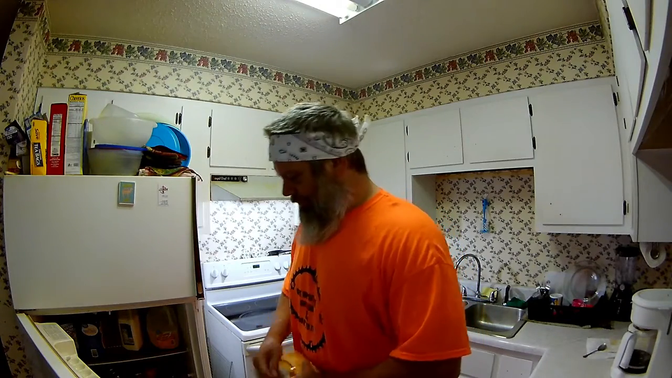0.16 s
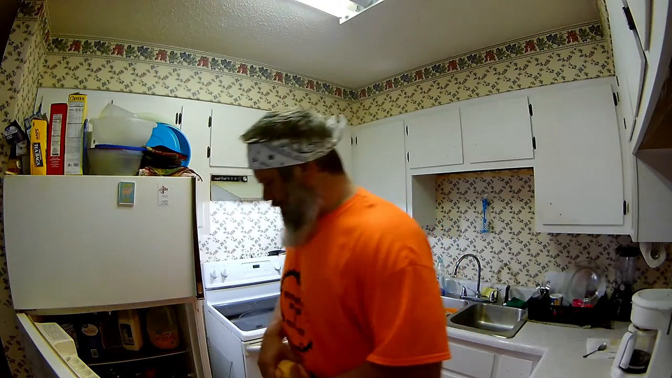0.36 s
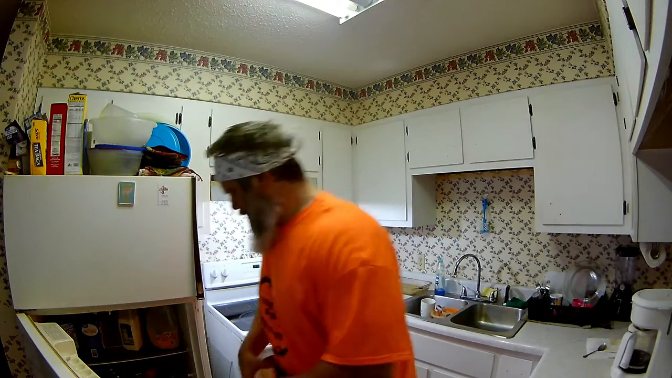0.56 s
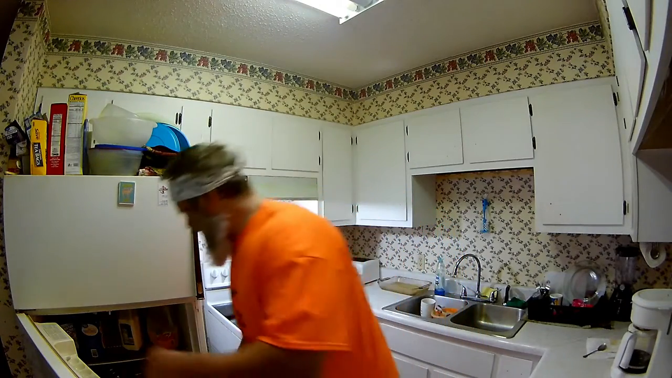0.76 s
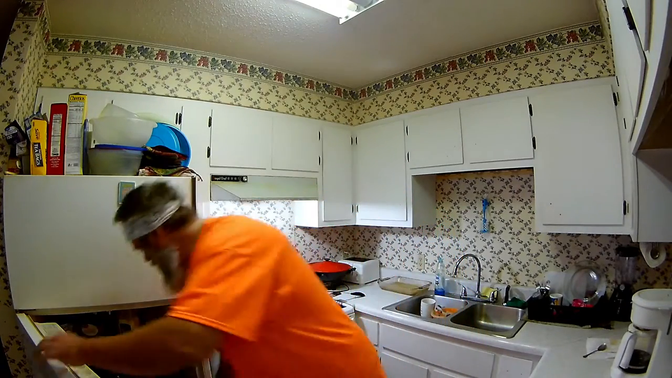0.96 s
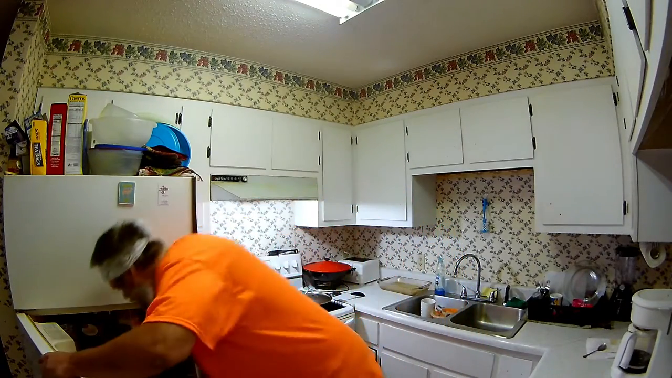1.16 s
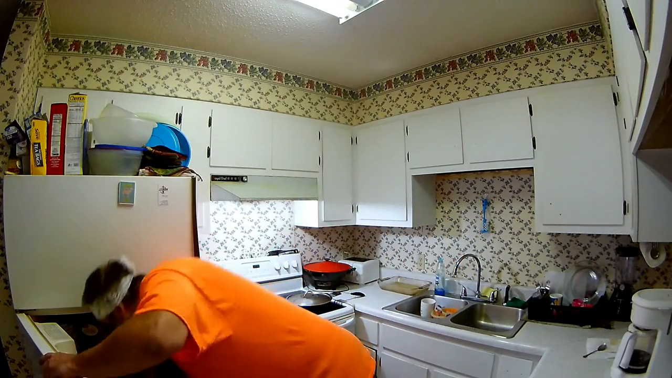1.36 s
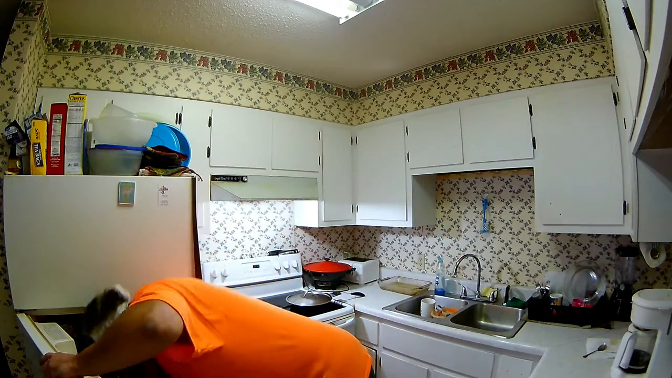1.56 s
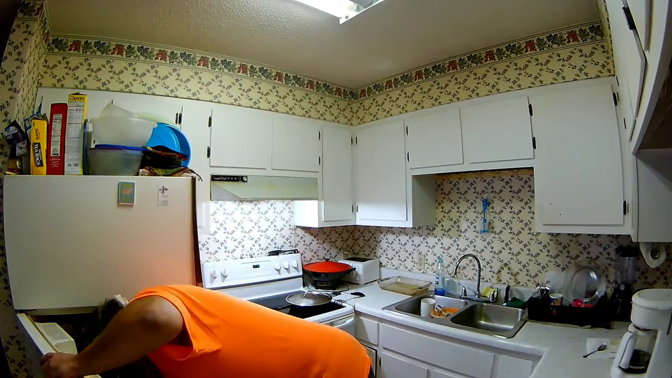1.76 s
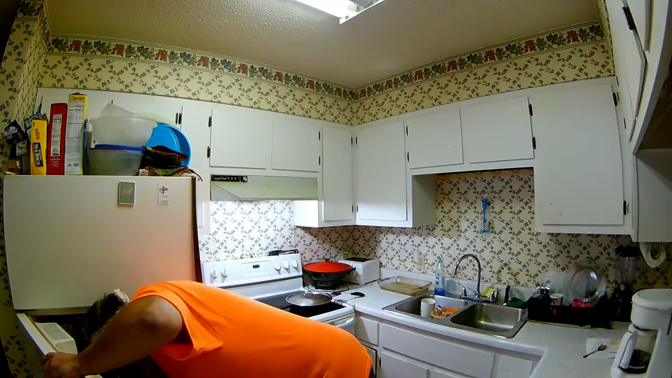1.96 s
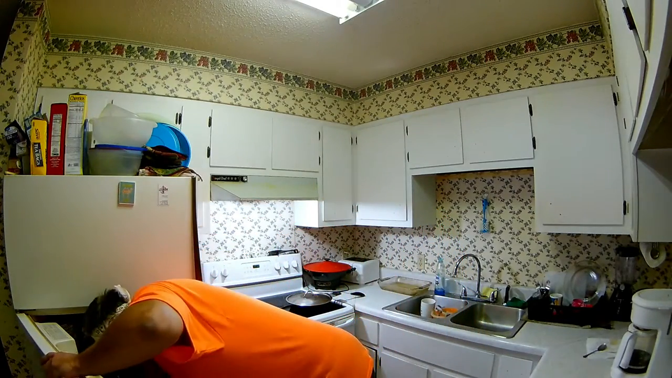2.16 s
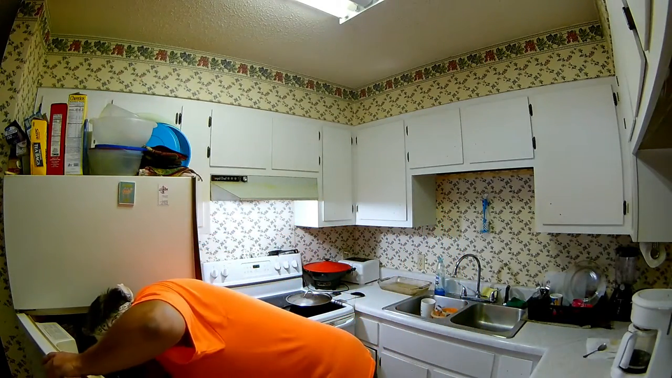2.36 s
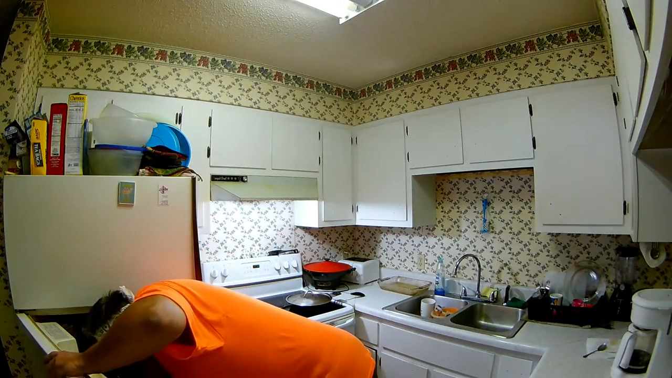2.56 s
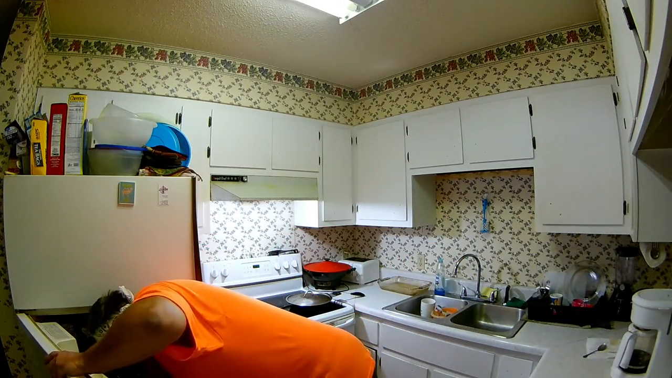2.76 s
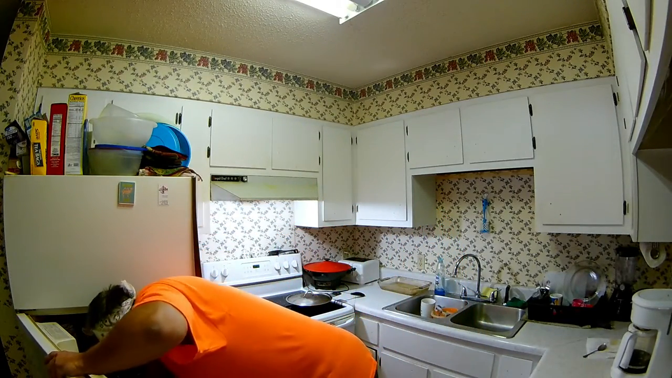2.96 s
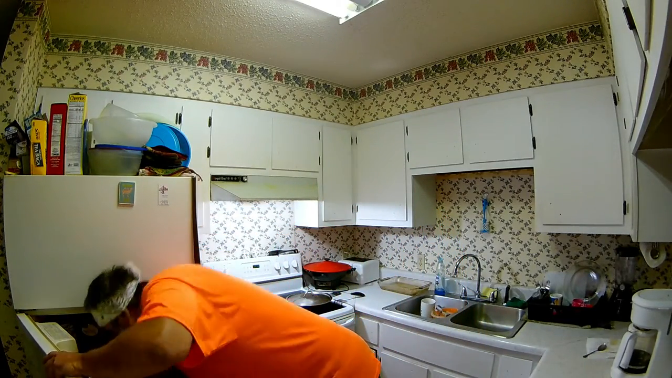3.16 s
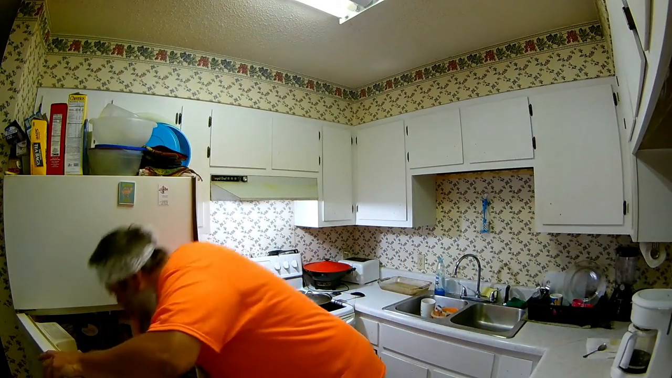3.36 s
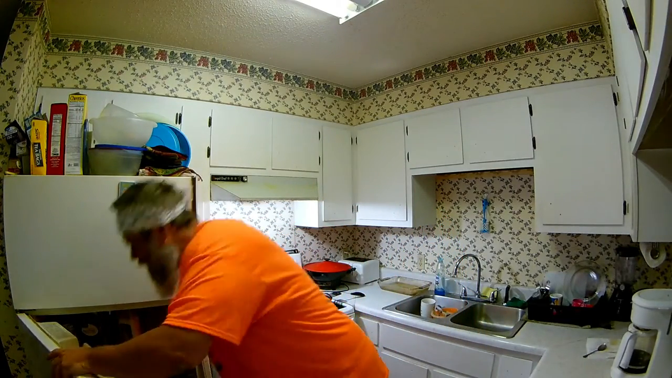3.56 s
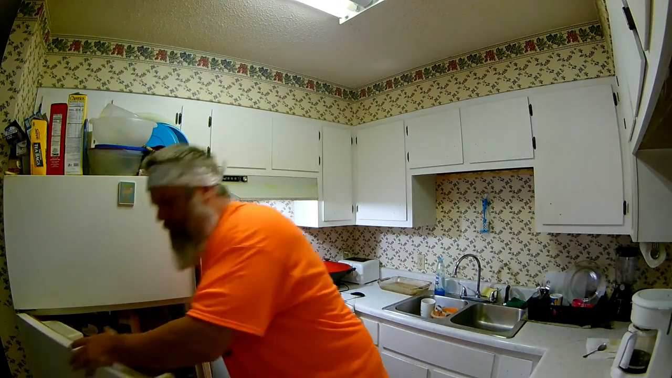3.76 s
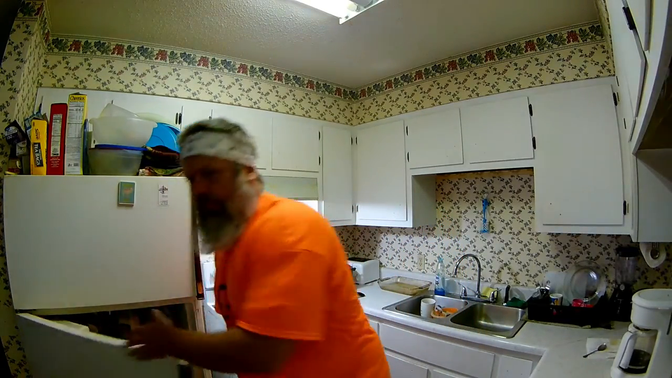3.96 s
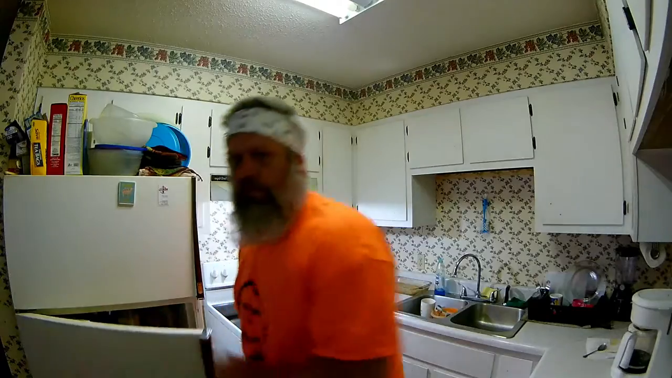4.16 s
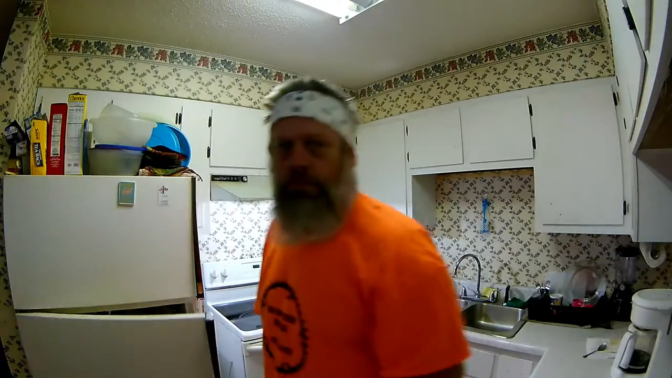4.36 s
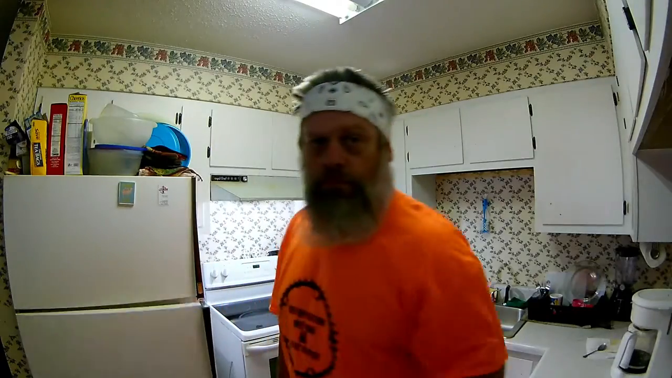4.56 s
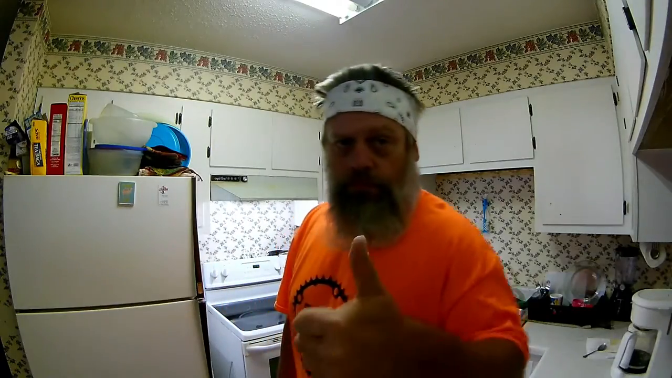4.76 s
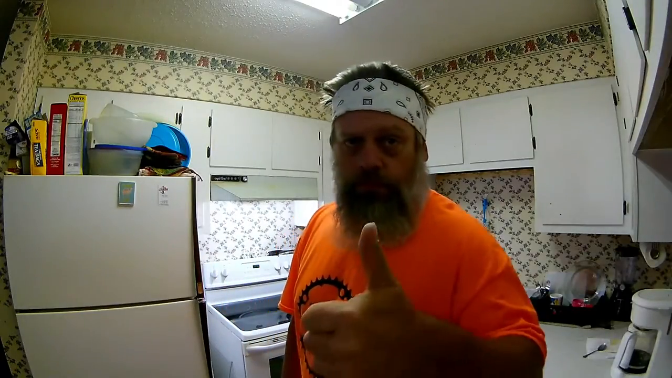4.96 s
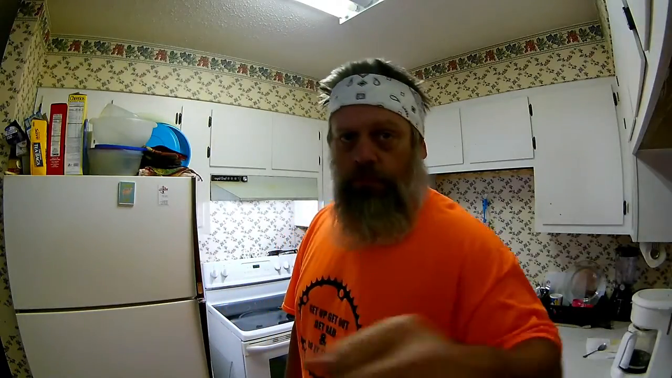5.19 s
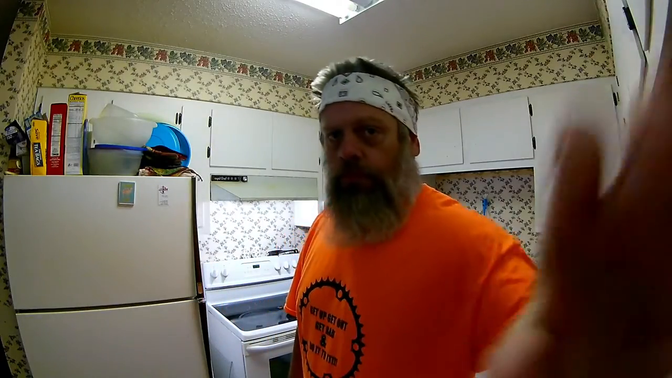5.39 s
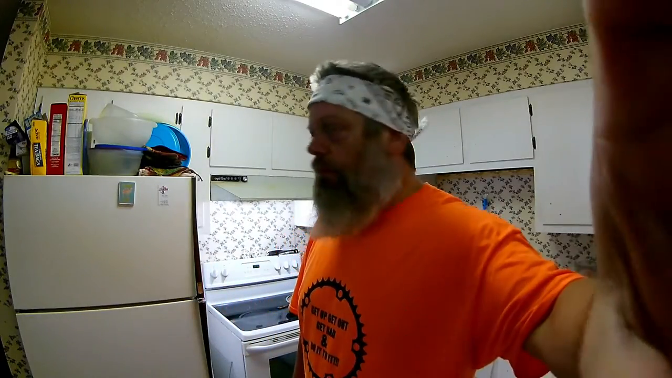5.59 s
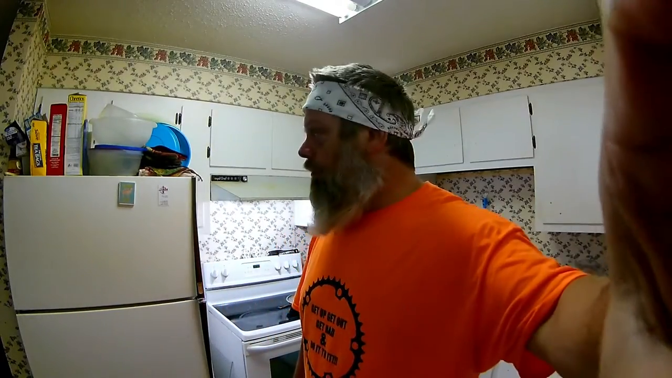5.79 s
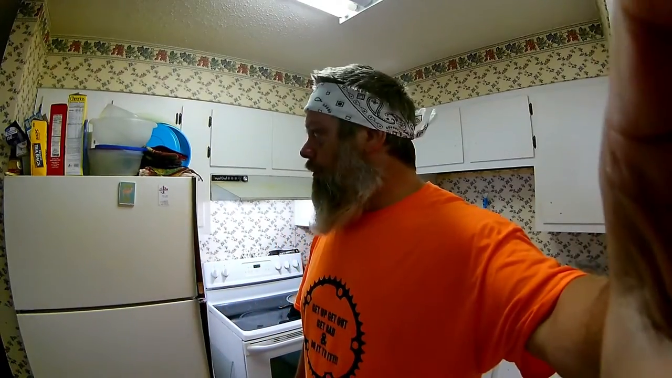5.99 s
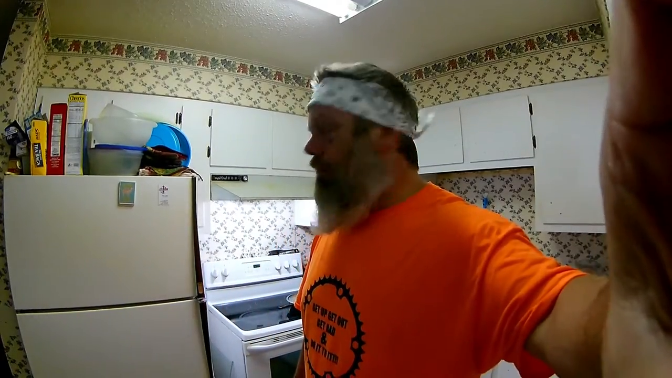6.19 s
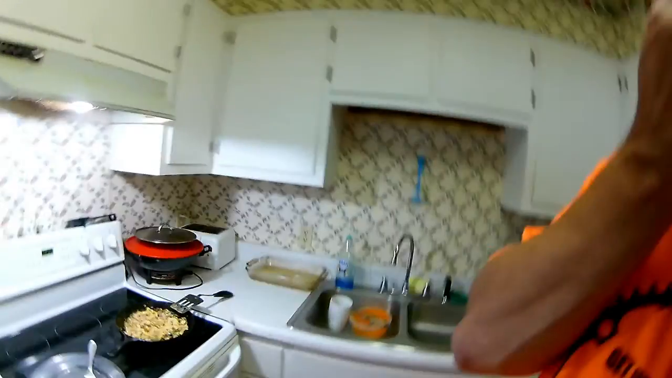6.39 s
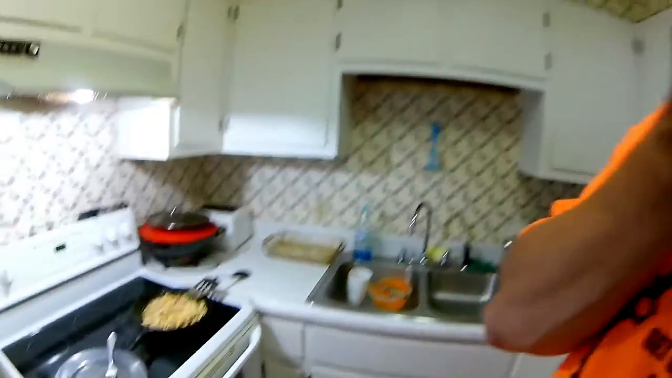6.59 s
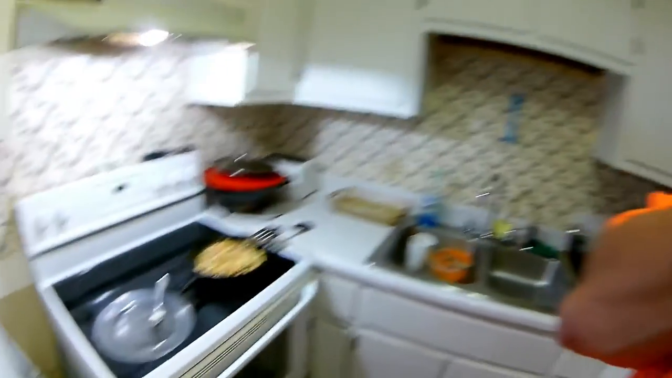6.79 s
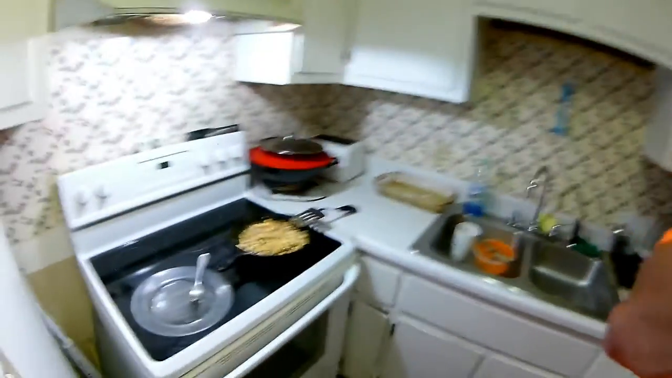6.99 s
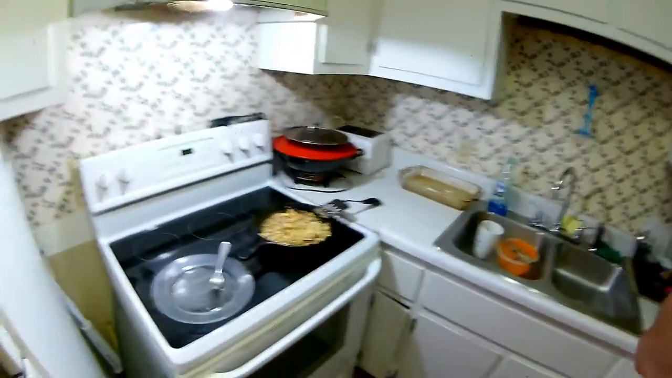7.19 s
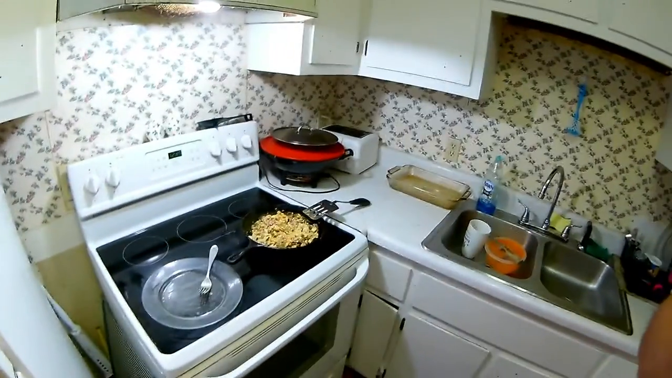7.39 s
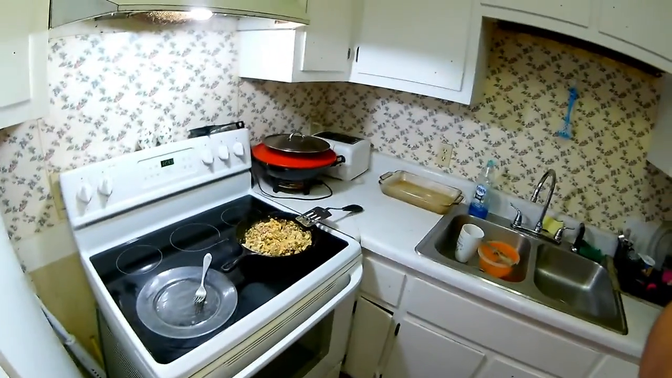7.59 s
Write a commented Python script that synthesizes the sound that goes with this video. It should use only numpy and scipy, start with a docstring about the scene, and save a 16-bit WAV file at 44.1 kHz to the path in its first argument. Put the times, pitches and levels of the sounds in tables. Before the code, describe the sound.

In a small kitchen, hands rummage in a humming fridge, bang a plastic drawer home, shut the door with a deep thump, then rub the microphone.

```python
"""In a small kitchen, a man rustles a crinkly package and rummages in an open refrigerator.
Rubbing is modelled as clumped slips filtered by surface tones; knocks and the door as damped modes and noise.
A drawer knocks home hollowly, the door shuts with a click and a deep thump, and fingers rub on a camera.
The compressor's steady sines, narrow-band singing and coloured air noise run beneath.
The sound drops out twice, the second time returning with a click."""
import sys
import numpy as np
from scipy import signal
from scipy.io import wavfile

SR = 44100
rng = np.random.default_rng(int(sys.argv[2]) if len(sys.argv) > 2 else 0)


def store_wav(level_fs):
    """Save 16-bit WAV to argv[1]."""
    pcm = np.round(np.clip(np.atleast_2d(level_fs), -1, 1) * 32767)
    wavfile.write(sys.argv[1], SR, pcm.T.astype(np.int16))


N = 336703
TIME = np.arange(N) / SR  # s

# Package squeezed, turned and put down: peak_s, rise_s, fall_s, body_db, crackle_db
PACKAGE_STROKES = [(.14, 0.4, 0.13, -39.5, -62.5), (.32, 0.12, 0.051, -44.5, -70),
                   (.48, 0.18, 0.11, -43.5, -65.5), (.72, 0.32, 0.22, -54.5, -78)]
# Spectrum of the package body: frequency_hz, level_db
PACKAGE_SPECTRUM = [(60, -19), (130, -32), (260, -1), (350, -16), (430, 1), (700, 1), (1050, -2),
                    (1450, -10), (2250, -10.5), (3200, -43.5), (5000, -61)]
# Film buckling: start_s, peak_db (before the kitchen's reverberation)
FILM_BUCKLES = [(0.0218, -44), (0.091, -41.5), (0.1288, -38), (0.2133, -41), (0.304, -45), (0.342, -49)]
# Spectrum of a film snap: frequency_hz, level_db
FILM_SPECTRUM = [(1000, -16), (2400, 11), (3200, 11), (5000, 5), (7000, 3), (7900, -18), (9000, -9),
                 (12500, -7), (15000, -23)]
BUCKLE_DECAY_S = 0.004  # time constant

# Plastic on plastic, as a hand reaches in, a container is pushed along a shelf, the drawer jerks loose,
# runs in and rides over its stop, and the door swings: peak_s, rise_s, fall_s, body_db, scrape_db
SLIDING_STROKES = [(1.04, 0.2, 0.075, -51.5, -73), (1.22, 0.22, 0.13, -54.5, -80),
                   (1.78, 0.37, 0.57, -46, -79), (1.733, 0.1, .11, -35, -60.5),
                   (2.592, 0.035, .05, -33, -61), (2.722, .016, 0.032, -39.5, -55),
                   (2.82, 0.27, 0.18, -35, -64.5), (2.964, 0.012, 0.037, -29.5, -62),
                   (4.015, 0.049, 0.056, -49, -68.5), (4.65, 0.28, 0.099, -43, -69.5)]
# Spectrum of the sliding body: frequency_hz, level_db
SLIDING_SPECTRUM = [(40, -3), (120, -2.5), (240, -0.5), (310, 5), (370, -8.5), (445, 7), (520, -3),
                    (600, -1), (700, -1), (900, -4.5), (1200, -10.5), (1500, -14.5), (2300, -16.5),
                    (3200, -50.5), (6000, -71)]
# Bright spectrum shared by package crackle and sliding scrape: frequency_hz, level_db
SCRAPE_SPECTRUM = [(1500, -27), (2600, 8), (3200, -0.5), (4500, 8), (7000, -2), (7900, -17), (9000, -11.5),
                   (12500, -12.5), (16000, -26.5)]

# Drawer knocking in its runners: start_s, level_db, contact_brightness_hz
DRAWER_KNOCKS = [(2.556, -33, 300), (2.577, -28, 410), (2.603, -28.5, 800), (2.712, -31.5, 1500),
                 (2.8705, -12.5, 1696), (2.895, -24, 2200), (2.914, -23.5, 1600), (2.940, -23, 700),
                 (2.960, -24.5, 300), (2.992, -30.5, 800)]
# Modes of plastic drawer and liner: frequency_hz, level_db, t60_s
LINER_MODES = [(90.5, -8.5, 0.25), (151.6, -2.5, 0.22), (210, -4, 0.25), (243, 4, 0.2), (268, 5.5, 0.1),
               (339.4, -8, 0.31), (450.3, 8.5, 0.2), (592.4, -2, 0.36), (728, 0.5, 0.12), (818, -7, 0.43),
               (896, -19.5, 0.19), (1013, -9, 0.37), (1016, -23, 0.4), (1156, -20.5, 0.64),
               (1448, -25.5, 0.38), (1800, -25, 0.39)]
# Dense response of drawer and room: frequency_hz, level_db
LINER_SPECTRUM = [(40, -31.5), (110, -7.5), (250, -0.5), (380, 5), (600, 2.5), (1000, -5), (1400, -15),
                  (2200, -17), (3000, -37.5), (6500, -35.5), (9000, -43), (16000, -49)]

# Door meeting its gasket: start_s, level_db, contact_brightness_hz
DOOR_BLOWS = [(4.7295, -27.5, 6000), (4.737, -27, 4060)]
# Modes of door and cabinet: frequency_hz, level_db, t60_s
DOOR_MODES = [(167, -19, 0.9), (241, 13, 0.29), (509, 5, 0.22), (527, 6, 0.21), (684, -30, 0.37),
              (768, -9, .29), (1000, 9.5, 0.38), (1070, 1, 0.21), (1087, -10.5, 0.8), (1570, -21, 0.22)]
# Dense response of door and room: frequency_hz, level_db
DOOR_SPECTRUM = [(30, 9), (100, 0.5), (250, 6.5), (340, -1.5), (550, 1.5), (1100, -4.5), (1500, -13.5),
                 (2200, -16), (3200, -28), (6500, -28.5), (8000, -43), (12500, -28), (16000, -53)]
# Whole cabinet rocking: start_s, frequency_hz, level_db, t60_s
CABINET_ROCKING = [(4.737, 43.5, -15, 0.274), (4.741, 29.9, -34, 0.86)]

# Light contacts of containers, door and camera: start_s, level_db, ring_hz, ring_relative_db
LIGHT_CONTACTS = [(0.025, -50.5, 2000, 12), (0.089, -42, 1890, -4), (0.2496, -47, 946, 6.5),
                  (0.302, -50.5, 1100, -24), (.385, -47, 786, 8), (0.433, -43.5, 990, 6),
                  (.486, -37.5, 980, 2), (.527, -54, 2250, 3), (0.6386, -45, 2140, 12),
                  (1.592, -55, 2150, -4), (1.696, -40.5, 875, -1), (1.797, -33.5, 300, 10.5),
                  (1.828, -42, 240, 15), (2.468, -48.5, 410, 12), (2.707, -45.5, 2220, -10.5),
                  (2.959, -49.5, 2030, 5), (3.702, -44.5, 223, 10), (3.985, -46, 452, 5),
                  (4.607, -40.5, 1620, -1), (4.618, -39.5, 1100, 3), (4.624, -56, 2730, -0.5),
                  (5.702, -56.5, 1780, 16), (7.373, -65, 1482, -11), (7.486, -60.5, 1360, 0)]
# Spectrum of the contact snap: frequency_hz, level_db
CONTACT_SPECTRUM = [(100, 3), (300, 4), (1100, 11), (2300, -7), (3200, -20), (6500, -21), (8000, -53),
                    (12000, -39), (16000, -48)]
# Added damping by the support (s to fall 60 dB) and by the material (cycles to fall 60 dB)
CONTACT_T60_S, CONTACT_T60_CYCLES = 0.6, 760

# Fingers brushing the camera shell: peak_s, rise_s, fall_s, body_db, hiss_db, thin_hiss_db
BRUSH_STROKES = [(5.703, 0.0034, 0.012, -58, -71, -72), (5.745, 0.0035, 0.022, -48, -61.5, -71),
                 (5.812, 0.034, .055, -50, -61, -62), (5.88, 0.014, 0.038, -56, -61, -82),
                 (5.982, 0.063, 0.07, -45.5, -48.5, -66), (6.22, 0.03, .035, -60, -65.5, -78)]
# Spectrum of the brushing body: frequency_hz, level_db
BRUSH_SPECTRUM = [(300, -4), (700, -2.5), (1100, 4.5), (1500, 0.5), (1950, -0.5), (2500, -13), (3500, -40)]
# Spectrum of the brushing hiss: frequency_hz, level_db
BRUSH_HISS_SPECTRUM = [(2500, -29), (3400, -4.5), (4300, 3.5), (5300, -8.5), (6600, -18), (7900, -33),
                       (9000, -27), (12000, -34), (16000, -48)]
# Spectrum of the thin brushing hiss: frequency_hz, level_db
THIN_HISS_SPECTRUM = [(4000, -19), (5400, -1), (6200, -3), (7000, -6), (7800, -25), (10000, -24),
                      (15000, -40)]
# Fingers slipping as they grip the camera: peak_s, rise_s, fall_s, level_db
GRIP_STROKES = [(6.354, 0.025, 0.0062, -37.5), (6.365, 0.0027, 0.016, -33), (6.377, .005, 0.027, -40.5),
                (6.506, 0.014, 0.026, -38.5), (6.56, 0.029, 0.053, -38), (6.677, .015, 0.02, -45.5),
                (6.759, 0.045, 0.018, -38.5), (6.8, .03, 0.061, -50)]
# Spectrum of the gripping slips: frequency_hz, level_db
GRIP_SPECTRUM = [(200, -7.5), (600, -10), (850, 1.5), (1150, 3), (1600, -3.5), (2000, -3), (2300, -29),
                 (2900, -34), (3400, -25), (4800, -46), (9000, -63)]

# Compressor tones: frequency_hz, door_open_db, door_shut_db, camera_lifted_db
COMPRESSOR_TONES = [(113.3, -61, -63.5, -61.5), (363, -85, -100, -67.5), (470, -66.5, -58, -71.5),
                    (720, -78.5, -71, -71.5), (810, -80, -80, -70.5)]
# Refrigerant flow singing in pipes and panels:
# frequency_hz, width_hz, door_open_db, door_shut_db, camera_lifted_db
PIPE_RESONANCES = [(169, 27, -64.5, -68.5, -58.5), (182, 4.2, -64.5, -66.5, -63), (235.1, 9, -63, -65, -76),
                   (286, 1.4, -66.5, -72.5, -78), (1420, 16, -95, -77.5, -78), (1812, 73, -75, -73.5, -78),
                   (1887, 14, -84, -72.5, -75.5)]
# Door shutting, then camera lifting, start and end of each: time_s
STAGE_TIMES = [4.7, 4.85, 6.3, 6.45]

# Fan rush with the door open: frequency_hz, level_db
OPEN_AIR_SPECTRUM = [(12, -28), (20, 2), (91, 2), (173, -2), (210, -3.5), (238, -2.5), (439, -5),
                     (472, -1.5), (508, -10), (547, -2.5), (649, -9.5), (771, -7), (1230, -9.5),
                     (1730, -24), (7000, -37), (9100, -71.5), (15400, -120)]
# Fan rush with the door shut: frequency_hz, level_db
SHUT_AIR_SPECTRUM = [(20, 0), (60, -6), (95, -4), (140, -5.5), (180, -11), (260, -7), (320, -12.5),
                     (500, -13), (700, -19), (1100, -20.5), (1600, -29.5), (1850, -26), (2100, -30.5),
                     (3000, -35), (7000, -41.5), (9000, -69)]
# Microphone hiss: frequency_hz, level_db
MICROPHONE_SPECTRUM = [(5000, -29.5), (6600, -6.5), (7200, -4.5), (7900, -9), (8700, -3), (12000, -3),
                       (13000, -4.5), (16000, -4)]
OPEN_AIR_DB, SHUT_AIR_DB, MICROPHONE_DB = -53, -54, -77.0

# Reverberation of the kitchen, before each use stretches it: frequency_hz, t60_s
KITCHEN_DECAY = [(60, 1), (250, 0.3), (1000, 0.63), (3000, 0.49), (8000, 0.43), (16000, 0.18)]
# Moments when the sound drops out: start_s, end_s
DROPOUT_TIMES = [(.81, .824), (6.23, 6.343)]
DROPOUT_DB, RETURN_CLICK_DB, BAND_EDGE_HZ = -50, -37.5, 15850

STROKE_EDGE_DB = -20  # level relative to a stroke's peak, one rise time before it or one fall time after
CLUMP_S = 0.018  # spacing of the random values that set slip strength
SPREAD_S = 0.0015  # time constant with which a blow spreads through the panels


def gain_of(db):
    """Level law: decibels become an amplitude ratio."""
    return 10 ** (np.asarray(db) / 20)


def evened(x):
    """Power normalisation: scales a sound to rms 1."""
    return x / np.sqrt(np.mean(x ** 2) + 1e-20)


def punch(x):
    """Onset normalisation: scales a blow to rms 1 over its first 30 ms."""
    onset = x[:round(0.03 * SR)]
    return x / np.sqrt(np.mean(onset ** 2) + 1e-20)


def read(points, hz):
    """Logarithmic pitch scale: interpolates a spectrum along log frequency."""
    point_hz, value = np.transpose(points)
    return np.interp(np.log(hz + 1), np.log(point_hz + 1), value)


def add(mix, start_s, sound):
    """Superposition: adds a sound to the mix from its starting time."""
    part = mix[max(round(start_s * SR), 0):][:len(sound)]
    part += sound[:len(part)]


def colour(x, points, size=4096):
    """Minimum-phase filtering: a causal response with the given spectrum and unit energy."""
    hz = abs(np.fft.fftfreq(size, 1 / SR))
    log_gain = np.log(gain_of(read(points, hz)))
    response = np.exp(np.conj(signal.hilbert(log_gain)))  # phase follows from the log gain
    taps = np.fft.ifft(response).real[:size // 2]
    return signal.oaconvolve(x, taps / np.linalg.norm(taps))[:len(x)]


def dying(stretch):
    """Frequency-dependent absorption: one second of noise dies at its own rate in each band."""
    hz, t, bands = signal.stft(rng.standard_normal(SR), SR, nperseg=256)
    t60_s = stretch * read(KITCHEN_DECAY, hz)[:, None]
    return signal.istft(bands * gain_of(-60 * t / t60_s), SR, nperseg=256)[1][:SR]


def reverberate(x, wet_db):
    """Diffuse reflection: hard cupboards and walls add a decaying tail to the direct sound."""
    buildup = np.minimum(np.arange(SR) / SR / 0.00087, 1)  # the tail builds up over 0.87 ms
    tail = dying(0.76) * buildup
    wet = signal.oaconvolve(x, tail / np.linalg.norm(tail))[:N]
    return (x + gain_of(wet_db) * wet) / np.hypot(1, gain_of(wet_db))


def ring(modes):
    """Modal vibration: damped sines of random phase swell quickly and ring for one second."""
    t = np.arange(SR) / SR
    total = np.zeros(SR)
    for hz, db, t60_s in modes:
        total += gain_of(db - 60 * t / t60_s) * np.sin(2 * np.pi * (hz * t + rng.random()))
    return (1 - np.exp(-t / SPREAD_S)) * total


def friction(strokes, spectra, per_s, spread_db, roundness, clump_db):
    """Stick-slip friction: uneven clumps of tiny slips excite one spectrum per level column."""
    occurs = rng.random(N) < per_s / SR
    size = gain_of(spread_db * np.minimum(rng.exponential(1, N), 4)) * occurs
    clumps = np.interp(TIME / CLUMP_S, np.arange(N), rng.standard_normal(N))
    slips = evened(size * gain_of(clump_db * clumps) * rng.choice([-1, 1], N))
    power = np.zeros((len(spectra), N))
    for peak_s, rise_s, fall_s, *levels_db in strokes:
        away = np.maximum((peak_s - TIME) / rise_s, (TIME - peak_s) / fall_s)
        near = away < 2
        stroke_db = np.array(levels_db)[:, None] + STROKE_EDGE_DB * away[near] ** roundness
        power[:, near] += gain_of(stroke_db) ** 2
    return sum(colour(slips * np.sqrt(p), spectrum) for p, spectrum in zip(power, spectra))


def blows(rows, modes, wash, wash_db, stretch, crack):
    """Impact excitation: each contact rings clear modes and a dense wash of panels and room."""
    out, t = np.zeros(N), np.arange(SR) / SR
    for start_s, db, bright_hz in rows:
        strike = dying(stretch) * (1 + crack * np.exp(-t / 0.033))
        sound = punch(ring(modes)) + gain_of(wash_db) * punch(colour(strike, wash))
        pole = np.exp(-2 * np.pi * bright_hz / SR)  # a longer, softer contact cuts more treble
        softened = signal.lfilter([1], np.poly([pole, pole]), sound)
        add(out, start_s, gain_of(db) * punch(softened))
    return out


def package():
    """Stick-slip friction: strokes of the package give a body tone and a bright crackle."""
    return friction(PACKAGE_STROKES, [PACKAGE_SPECTRUM, SCRAPE_SPECTRUM],
                    per_s=600, spread_db=2.0, roundness=1.65, clump_db=1.9)


def buckling_film():
    """Snap-through buckling: each buckle of the film is a bright noise burst of a few milliseconds."""
    out, t = np.zeros(N), np.arange(SR // 10) / SR
    for start_s, peak_db in FILM_BUCKLES:
        burst = rng.standard_normal(len(t)) * np.exp(-t / BUCKLE_DECAY_S)
        snap = colour(burst, FILM_SPECTRUM)
        add(out, start_s, gain_of(peak_db) * snap / abs(snap).max())
    return out


def sliding():
    """Stick-slip friction: plastic sliding on plastic gives a body tone and a scrape."""
    return friction(SLIDING_STROKES, [SLIDING_SPECTRUM, SCRAPE_SPECTRUM],
                    per_s=1200, spread_db=1.5, roundness=1.44, clump_db=1.3)


def rummaging():
    """Reverberant superposition: package, film and sliding plastic share the kitchen's tail."""
    return reverberate(package() + buckling_film() + sliding(), wet_db=-2)


def drawer():
    """Impact excitation: knocks in the runners ring the hollow drawer and liner."""
    return blows(DRAWER_KNOCKS, LINER_MODES, LINER_SPECTRUM, wash_db=-2.5, stretch=0.74, crack=0.9)


def door():
    """Impact and rigid-body motion: the door lands on its gasket and trapped air rocks the cabinet."""
    out = blows(DOOR_BLOWS, DOOR_MODES, DOOR_SPECTRUM, wash_db=7.5, stretch=0.88, crack=1.4)
    t = np.arange(SR) / SR
    for start_s, hz, db, t60_s in CABINET_ROCKING:
        add(out, start_s, gain_of(db - 60 * t / t60_s) * np.sin(2 * np.pi * hz * t))
    return out


def light_contacts():
    """Damped resonance: each contact is a noise snap with the room's answer plus a narrow ringing band."""
    out, t = np.zeros(N), np.arange(SR) / SR
    for start_s, db, hz, ring_db in LIGHT_CONTACTS:
        strike = dying(0.95) * (1 + 3 * np.exp(-t / 0.0021))
        snap = punch(colour(strike, CONTACT_SPECTRUM))
        band = signal.butter(2, [hz / 1.11, hz * 1.11], "bandpass", fs=SR)
        cluster = signal.lfilter(*band, strike)
        damping = 1 / CONTACT_T60_S + hz / CONTACT_T60_CYCLES  # higher rings die sooner
        cluster = cluster * gain_of(-60 * t * damping)
        add(out, start_s, gain_of(db) * punch(snap + gain_of(ring_db) * punch(cluster)))
    return out


def fingers():
    """Stick-slip friction: skin brushes and grips the camera shell, close and nearly dry."""
    brush = friction(BRUSH_STROKES, [BRUSH_SPECTRUM, BRUSH_HISS_SPECTRUM, THIN_HISS_SPECTRUM],
                     per_s=2700, spread_db=2.0, roundness=1.77, clump_db=2.0)
    grip = friction(GRIP_STROKES, [GRIP_SPECTRUM],
                    per_s=1700, spread_db=0.4, roundness=1.53, clump_db=-0.3)
    return reverberate(brush + grip, wet_db=-20)


def standing_wave_gain(open_db, shut_db, lifted_db):
    """Standing waves: the level shifts when the door shuts and when the camera is lifted."""
    return gain_of(np.interp(TIME, STAGE_TIMES, [open_db, shut_db, shut_db, lifted_db]))


def compressor():
    """Periodic vibration: the compressor hums in several steady sines."""
    out = np.zeros(N)
    for hz, *levels_db in COMPRESSOR_TONES:
        tone = np.sqrt(2) * np.sin(2 * np.pi * (hz * TIME + rng.random()))  # rms 1
        out += standing_wave_gain(*levels_db) * tone
    return out


def singing_pipes():
    """Resonance under turbulence: flow noise excites narrow, wavering bands in pipes and panels."""
    out = np.zeros(N)
    for hz, width_hz, *levels_db in PIPE_RESONANCES:
        edges_hz = [hz - width_hz / 2, hz + width_hz / 2]
        pipe = signal.butter(2, edges_hz, "bandpass", fs=SR, output="sos")
        flow = signal.sosfilt(pipe, rng.standard_normal(N + SR))[SR:]  # drop the filter's build-up
        out += standing_wave_gain(*levels_db) * evened(flow)
    return out


def air():
    """Broadband noise: the fan's rush is muffled as the door shuts, over steady microphone hiss."""
    opened = np.interp(TIME, STAGE_TIMES[:2], [1, 0])
    rush = gain_of(OPEN_AIR_DB) * colour(rng.standard_normal(N), OPEN_AIR_SPECTRUM)
    muffled = gain_of(SHUT_AIR_DB) * colour(rng.standard_normal(N), SHUT_AIR_SPECTRUM)
    hiss = gain_of(MICROPHONE_DB) * colour(rng.standard_normal(N), MICROPHONE_SPECTRUM)
    return np.sqrt(opened) * rush + np.sqrt(1 - opened) * muffled + hiss


def scene():
    """Superposition: every source adds at the listening point on the counter."""
    handling = rummaging() + drawer() + door() + light_contacts() + fingers()
    background = compressor() + singing_pipes() + air()
    return (handling + background)[None]


def record(dry):
    """Gating and band limiting: two dropouts, a click ending the second, then a low-pass filter."""
    live = np.ones(N)
    for start_s, end_s in DROPOUT_TIMES:
        live[(TIME > start_s) & (TIME < end_s)] = gain_of(DROPOUT_DB)
    return_sample = round(DROPOUT_TIMES[-1][1] * SR)
    click = gain_of(RETURN_CLICK_DB) * signal.unit_impulse(N, return_sample)
    lowpass = signal.firwin(511, BAND_EDGE_HZ, window=("kaiser", 9), fs=SR)
    return signal.oaconvolve(dry * live + click, lowpass[None], "same")


dry = scene()
out = record(dry)
store_wav(out)
```